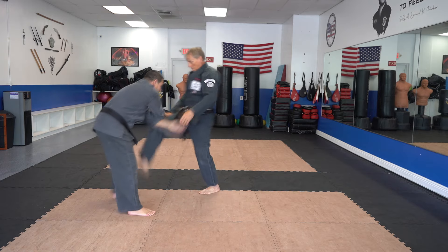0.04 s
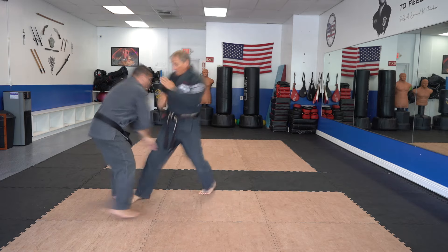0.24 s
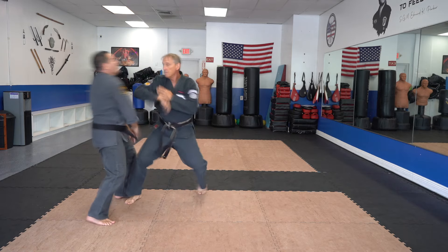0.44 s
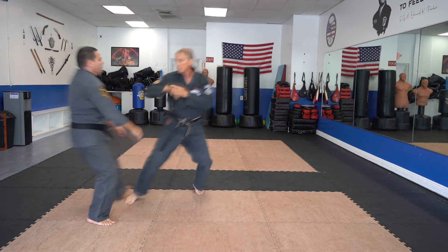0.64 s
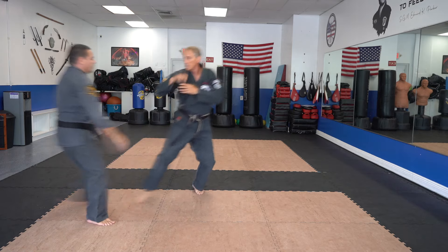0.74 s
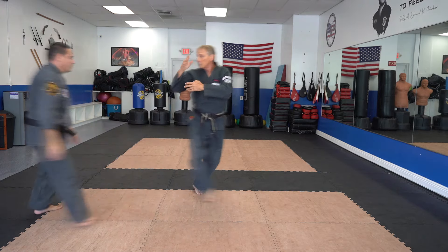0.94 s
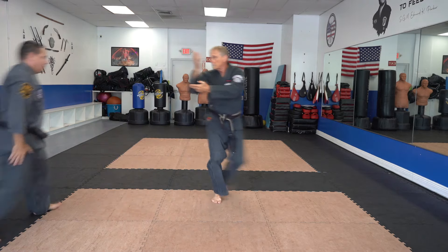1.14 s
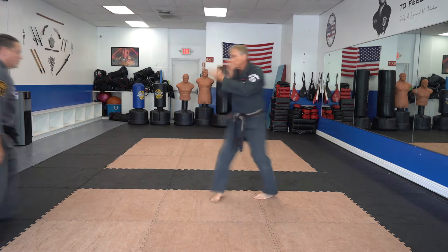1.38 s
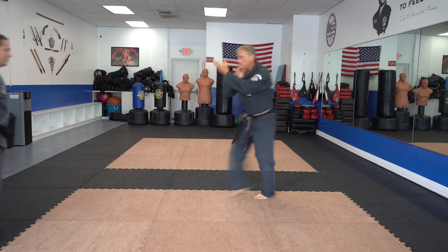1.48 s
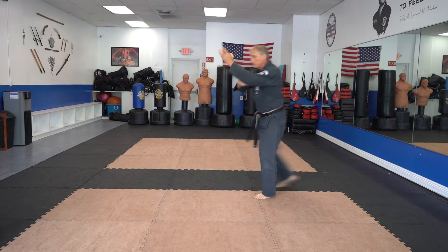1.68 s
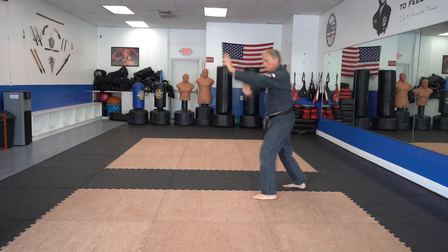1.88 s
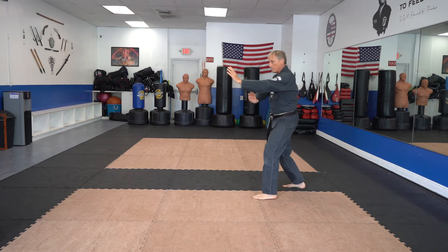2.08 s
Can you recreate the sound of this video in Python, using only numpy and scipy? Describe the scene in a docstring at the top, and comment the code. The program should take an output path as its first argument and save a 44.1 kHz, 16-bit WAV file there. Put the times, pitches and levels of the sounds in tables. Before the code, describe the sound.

Two people spar in stiff cotton uniforms, with sharp smacks, thuds and rustling in a training hall

```python
"""Sparring on the mats

Two people in heavy cotton uniforms spar on foam mats in a training hall.
Blows thump as dull pitched bursts, sleeves crack as short noise crackles, hands and bare feet pat the mat,
and cloth swishes as swelling noise. Echoes fade in a fraction of a second over floor boom and low ventilation."""
import sys
import numpy as np
from scipy import signal
from scipy.fft import rfft, irfft
from scipy.io import wavfile
from scipy.ndimage import map_coordinates

SR = 44100
rng = np.random.default_rng(int(sys.argv[2]) if len(sys.argv) > 2 else 0)


def to_wav(s):
    """Save 16-bit WAV."""
    ch = np.atleast_2d(s).T  # columns
    pcm = np.round(np.clip(ch, -1, 1) * 32767)  # PCM
    wavfile.write(sys.argv[1], SR, pcm.astype(np.int16))


N = 93536
T = np.arange(N) / SR
BURST_SIZE = 8192  # samples that hold one contact


def from_db(db):
    """Decibels to gain."""
    return 10 ** (np.asarray(db) / 20)


def rms_one(x):
    """Scale to unit rms."""
    return x / np.sqrt(np.mean(x ** 2) + 1e-20)


def bins(size):
    """Frequencies in Hz of a spectrum of that many samples, with zero raised to 1 Hz."""
    return np.maximum(np.fft.rfftfreq(size, 1 / SR), 1)


def at_hz(points, hz):
    """Read a table on a log-frequency axis."""
    table_hz, values = np.transpose(points)
    return np.interp(np.log(hz), np.log(table_hz), values)


def over_time(points):
    """Draw straight lines through a table of moments and values."""
    return np.interp(T, *np.transpose(points))


def noise(gain):
    """Unit-rms noise with a given gain at each frequency."""
    white = rng.standard_normal(2 * len(gain) - 2)
    return rms_one(irfft(rfft(white) * gain))


def diffuse(gain):
    """Stereo noise from all round: alike in the bass, nearly unrelated in the treble."""
    # likeness of the two channels: pitch_hz, left_right_correlation [0-1]
    likeness = [(60, 1), (130, .9995), (260, 1), (520, 0.84), (1000, 0.39), (2000, 0.081), (16000, 0.025)]
    size = 2 * len(gain) - 2
    alike = np.clip(at_hz(likeness, bins(size)), -1, 1)
    mid, side = rfft(rng.standard_normal((2, size)))
    shared = np.sqrt(1 + alike) * mid
    opposed = np.sqrt(1 - alike) * side * [[1], [-1]]
    return rms_one(irfft(gain * (shared + opposed)))


def ventilation():
    """A steady rush of air with two wavering hum tones, each a narrow band of noise."""
    # hum tones: pitch_hz, level_db, width_hz
    hum_tones = [(58.8, -57, 3.9), (123.5, -52.5, 8)]
    # colour of the rushing air: pitch_hz, relative_level_db [dB per Hz]
    air_colour = [(8, -30), (25, -10), (34, 0), (43, 0.5), (56, 1), (75, 0), (100, -5.5), (135, -5),
                  (170, -2.5), (230, -8), (320, -10), (500, -11.5), (800, -20.5), (1500, -21.5),
                  (3000, -25.5), (7000, -25.5), (16000, -37)]
    hz = bins(N)
    hum = sum(from_db(level_db) * diffuse(1 / (1 + (2 * (hz - pitch_hz) / width_hz) ** 2))
              for pitch_hz, level_db, width_hz in hum_tones)
    air_db = -46
    return hum + from_db(air_db) * diffuse(from_db(at_hz(air_colour, hz)))


def floor_boom():
    """Shifting weight keeps the floor booming softly: low noise that rises and sinks with the footwork."""
    # loudness of the boom: time_s, level_db
    boom_levels = [(0, -42), (.25, -48), (.5, -52), (.7, -49), (1.05, -42.5), (1.35, -47), (1.75, -50.5),
                   (1.85, -52), (2.12, -60)]
    # colour of the boom: pitch_hz, relative_level_db [dB per Hz]
    boom_colour = [(50, -43), (90, -14.5), (122, 4), (160, -9.5), (215, -7), (300, -15.5), (600, -47),
                   (3000, -70)]
    return from_db(over_time(boom_levels)) * diffuse(from_db(at_hz(boom_colour, bins(N))))


def reflections():
    """The hall's answer from one spot: dense echoes die band by band, a few low resonances ring on."""
    # time for echoes to fall 60 dB: pitch_hz, t60_s
    decay_times = [(100, 0.74), (350, 0.49), (700, 0.24), (1500, 0.38), (4000, 0.2), (8000, 0.29),
                   (16000, 0.1)]
    # strength of the echoes: pitch_hz, relative_level_db
    echo_colour = [(100, 10), (350, 2.5), (700, 2.5), (1500, -1.5), (4000, -2.5), (8000, 5.5),
                   (16000, -5.5)]
    # resonances of the hall: pitch_hz, relative_level_db, t60_s
    resonances = [(337.6, -43.5, 0.35), (629, -66, 0.17), (679, -60, 0.69), (877, -56, 0.21)]
    gap_s, build_s = 0.0014, 0.001
    tail_size = 32768
    t, centres = T[:tail_size], np.geomspace(60, 16000, 10)
    wash, tail = rfft(diffuse(np.ones(tail_size // 2 + 1))), 0
    build = 1 - np.exp(-np.maximum(t - gap_s, 0) / build_s)
    for hz, pick in zip(centres, np.eye(len(centres))):
        fade = build * from_db(-60 * t / at_hz(decay_times, hz))
        # overlapping triangles on a log-frequency axis split the wash into bands
        band_gain = np.interp(np.log(bins(tail_size)), np.log(centres), pick)
        band = irfft(wash * band_gain)
        tail = tail + band * from_db(at_hz(echo_colour, hz)) * rms_one(fade) / np.sqrt(tail_size)
    for hz, level_db, t60_s in resonances:
        tail = tail + np.sin(2 * np.pi * hz * t) * from_db(level_db - 60 * t / t60_s)
    return tail


def hall(x, wet_db):
    """Limbs keep moving, so the pattern of reflections keeps shifting between two spots."""
    shift_hz = 3.22
    turn = 2 * np.pi * shift_hz * T
    wet = 0
    for share in (np.cos(turn), np.sin(turn)):
        wet = wet + signal.fftconvolve(reflections(), (x * share)[None], axes=1)[:, :N]
    return from_db(wet_db) * wet


def placed(x):
    """Place direct sound by arrival time and level as the action crosses the mat."""
    # head start of the left side, negative when late: time_s, lead_ms
    left_lead = [(0, 0.1), (.4, 0.092), (1.2, 0.099), (1.65, 0.11), (1.95, -0.032)]
    # balance: time_s, left_minus_right_db
    balance = [(0, 0.5), (.36, -0.5), (.95, 2.5), (1.138, 4.5), (1.2, 2.5), (1.55, 0.5), (1.95, -10)]
    lead_s = over_time(left_lead) / 1000
    pan_db = over_time(balance)
    right = map_coordinates(x, [(T - lead_s) * SR], order=5)
    return np.array([x * from_db(pan_db / 2), right * from_db(-pan_db / 2)])


def grain(rate_hz, depth_db, size):
    """Random flutter of gain as folds catch and let go."""
    wander = np.clip(noise(1 / (1 + (bins(size) / rate_hz) ** 2)), -2, 2)
    return rms_one(from_db(depth_db * wander))


def rustle(power, colour, flutter, t60_s):
    """Moving cloth, heard directly and as a smooth wash that lingers in the hall."""
    wet_db = 4
    gain = from_db(at_hz(colour, bins(N)))
    keep = from_db(-120 / (t60_s * SR))  # power kept per sample: 60 dB down after t60_s
    lingering = signal.lfilter([1 - keep], [1, -keep], power, zi=[power[0]])[0]
    direct = placed(np.sqrt(power) * noise(gain) * flutter)
    wash = from_db(wet_db) * np.sqrt(lingering) * diffuse(gain)
    return direct + wash


def swishes():
    """Each sweep rises and falls: a fine hiss of weave over a coarser rub of folds."""
    # sweeps of sleeves and trouser legs, soles brushing the mat, levels before the trim:
    # peak_s, rise_s, fall_s, hiss_db, rub_db
    sweeps = [(.03, .07, 0.042, -44, -42.5), (0.109, 0.031, 0.042, -39.5, -40.5),
              (.28, 0.051, 0.092, -42, -45.5), (.42, 0.017, 0.072, -45.5, -41),
              (.635, 0.039, 0.014, -53, -49.5), (.79, 0.027, 0.023, -51, -54),
              (.86, 0.053, 0.075, -43.5, -55.5), (0.936, 0.016, 0.038, -37, -40),
              (1.04, 0.064, 0.032, -44.5, -48), (1.2, 0.059, 0.055, -46.5, -36.5),
              (1.38, 0.048, 0.048, -43.5, -45), (1.525, 0.032, 0.022, -34, -55),
              (1.575, 0.023, 0.022, -32, -50), (1.665, .04, 0.054, -39.5, -54.5),
              (1.801, 0.055, 0.025, -44, -61), (1.885, 0.036, 0.043, -43.5, -48)]
    # colour of the weave: pitch_hz, relative_level_db [dB per Hz]
    hiss_colour = [(400, -37), (1500, -48), (3000, -7), (4800, -7), (6500, 2.5), (8500, 0), (10500, 0.5),
                   (13000, -2.5), (16000, -4.5)]
    # colour of the folds: pitch_hz, relative_level_db [dB per Hz]
    rub_colour = [(40, -44), (150, -9), (400, 2), (900, 4), (1600, -1), (2400, 2.5), (3600, 0),
                  (5000, -2.5), (8000, -6), (16000, -61)]
    trim_db = -2.5
    hiss_power = rub_power = 0
    for peak_s, rise_s, fall_s, hiss_db, rub_db in sweeps:
        spread_s = np.where(T < peak_s, rise_s, fall_s)
        speed = np.exp(-.5 * ((T - peak_s) / spread_s) ** 2)
        hiss_power = hiss_power + (speed * from_db(hiss_db)) ** 2
        rub_power = rub_power + (speed * from_db(rub_db)) ** 2
    hiss = rustle(hiss_power, hiss_colour, grain(rate_hz=140, depth_db=2, size=N), t60_s=0.22)
    rub = rustle(rub_power, rub_colour, grain(rate_hz=130, depth_db=5.5, size=N), t60_s=0.21)
    return from_db(trim_db) * (hiss + rub)


def burst(source, time_s, level_db, swell_s, decay_s):
    """A contact swells up to its moment and dies away."""
    half = BURST_SIZE // 2
    t = (np.arange(BURST_SIZE) - half) / SR
    shape = np.exp(-np.maximum(-t / max(swell_s, 1e-4), t / max(decay_s, 1e-4)))
    # the shape sets the energy, whatever the source happens to do at its peak
    contact = rms_one(source * shape) * np.sqrt(np.mean(shape ** 2))
    out, start = np.zeros(N + BURST_SIZE), int(time_s * SR)
    out[start:start + BURST_SIZE] = from_db(level_db) * contact
    return out[half:half + N]


def pop(hz, octaves):
    """Irregular vibration of even strength round one pitch."""
    band = 1 / (1 + (np.log2(bins(BURST_SIZE) / hz) / octaves / 1.39) ** 6)
    even = np.cos(np.angle(signal.hilbert(noise(band))))  # keeps the phase, flattens the envelope
    return irfft(rfft(even) * np.sqrt(band))


def pats():
    """Light contacts pop as trapped air escapes."""
    # light pats of hands, soles and loose folds, levels before the trim:
    # time_s, level_db, pitch_hz, swell_s, decay_s
    light_contacts = [(0.016, -42.5, 1100, 0.03, 0.027), (.148, -37, 1150, 0.0098, 0.015),
                      (0.199, -36, 2500, 0.0093, 0.013), (.346, -20.5, 1300, 0.0057, 0.021),
                      (.505, -40, 1390, 0.057, 0.0075), (0.662, -44, 1130, 0.0043, .008),
                      (0.904, -38.5, 972, 0.0057, 0.016), (0.9478, -24.5, 1380, .001, 0.0045),
                      (0.9538, -18, 1300, .0008, 0.0015), (0.971, -36, 1070, .007, 0.014),
                      (1.047, -35.5, 1130, 0.0038, .009), (1.13, -29, 2200, 0.0081, .003),
                      (1.145, -24.5, 1470, 0.0064, 0.0046), (1.2, -30.5, 1530, 0.01, .012),
                      (1.262, -33.5, 1660, 0.0077, 0.0076), (1.466, -48, 972, 0.0074, 0.017),
                      (1.57, -46.5, 1030, 0.022, 0.02), (1.653, -38.5, 1124, 0.0051, 0.014),
                      (1.93, -46.5, 1100, 0.0031, .01)]
    trim_db, width_octaves = -.5, 0.51
    total = sum(burst(pop(pitch_hz, width_octaves), time_s, level_db, swell_s, decay_s)
                for time_s, level_db, pitch_hz, swell_s, decay_s in light_contacts)
    return from_db(trim_db) * total


def slaps():
    """Cloth pulled taut cracks in a few milliseconds of crackle."""
    # cloth cracks as a strike lands, levels before the trim, tilt acting above 700 Hz:
    # time_s, level_db, swell_s, decay_s, tilt_db_per_octave
    cracks = [(.325, -29, 0.012, 0.01, -1), (0.3471, -24.5, 0.013, 0.0033, -1.5),
              (.3535, -16, 0.0021, 0.0013, 2), (.3575, -17.5, 0.0013, 0.001, 1),
              (0.363, -25.5, 0.001, 0.0024, -0.5), (.44, -33.5, 0.0034, 0.0027, -2),
              (1.106, -41, .0003, .0008, 7), (1.135, -27.5, .0004, 0.0062, 4.5),
              (1.138, -16.5, 0.0016, .0013, 2), (1.1479, -22, 0.0032, 0.0031, 1.5),
              (1.155, -22.5, .002, 0.0017, 2), (1.163, -41, 0.0012, 0.0038, 5),
              (1.256, -35, 0.001, 0.0022, 5), (1.454, -35.5, 0.00063, 0.0018, 1.5)]
    # colour before the tilt: pitch_hz, relative_level_db [dB per Hz]
    crack_colour = [(40, -43), (150, 2), (400, -0.5), (900, -5), (1700, 3), (2800, 3), (4500, -0.5),
                    (7000, -7), (11000, -13), (14000, -15.5), (16000, -13.5)]
    trim_db = 2.5
    hz, out = bins(BURST_SIZE), 0
    for time_s, level_db, swell_s, decay_s, tilt in cracks:
        octaves_up = np.log2(np.maximum(hz / 700, 1))
        colour = from_db(at_hz(crack_colour, hz) + tilt * octaves_up)
        crackle = noise(colour) * grain(rate_hz=900, depth_db=1.0, size=BURST_SIZE)
        out = out + burst(crackle, time_s, level_db, swell_s, decay_s)
    return from_db(trim_db) * out


def thumps():
    """Soft, heavy contacts start at once and ring dully."""
    # padded blows on the body and heels on the mat, levels before the trim:
    # time_s, level_db, pitch_hz, decay_s
    blows = [(0.015, -40, 337, 0.014), (0.2956, -18.5, 810, 0.0015), (0.303, -16.5, 784, 0.0027),
             (0.314, -19.5, 734, 0.018), (.33, -23.5, 364, 0.04), (0.341, -21, 734, 0.036),
             (.359, -32.5, 144, 0.016), (.372, -15, 650, 0.0039), (0.406, -20, 574, 0.0067),
             (0.437, -23, 342, 0.011), (.479, -31.5, 645, 0.012), (0.955, -35.5, 545, 0.042),
             (0.991, -41, 464, 0.0064), (1.001, -23, 504, 0.0061), (1.058, -41, 354, 0.023),
             (1.139, -23, 706, 0.021), (1.18, -34.5, 490, 0.032), (1.267, -38.5, 481, 0.041)]
    trim_db, width_octaves, attack_s = -2.5, .45, 0.00023
    total = sum(burst(pop(pitch_hz, width_octaves), time_s, level_db, attack_s, decay_s)
                for time_s, level_db, pitch_hz, decay_s in blows)
    return from_db(trim_db) * total


def scene():
    """The sparring pair, their hall and its hum."""
    contacts = [(slaps(), -1), (thumps(), -2.5), (pats(), -1)]  # each with its hall level in dB
    strikes = sum(placed(x) + hall(x, wet_db) for x, wet_db in contacts)
    return strikes + swishes() + floor_boom() + ventilation()


def record(dry):
    """The top is cut steeply."""
    cutoff_hz = 15900
    return irfft(rfft(dry) / (1 + (bins(N) / cutoff_hz) ** 200), N)


dry = scene()
out = record(dry)
to_wav(out)
```